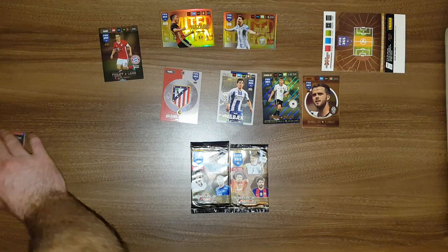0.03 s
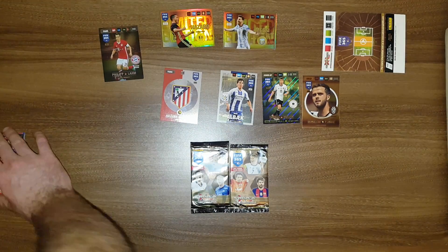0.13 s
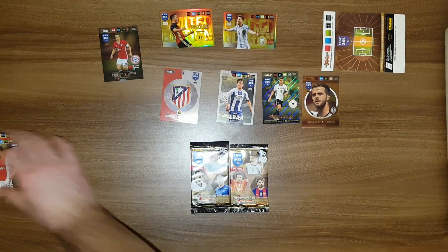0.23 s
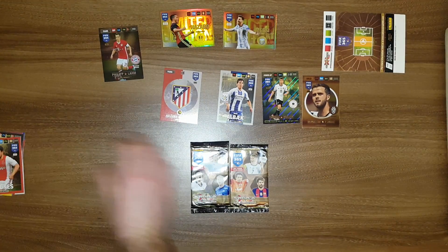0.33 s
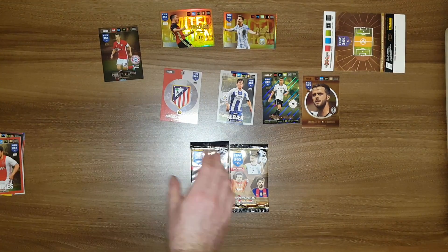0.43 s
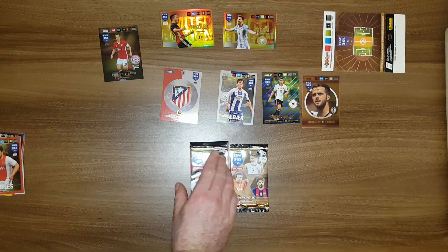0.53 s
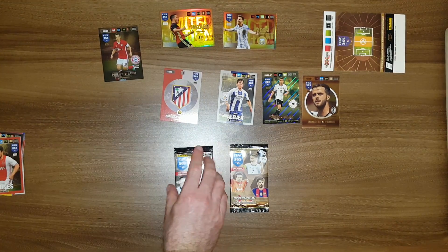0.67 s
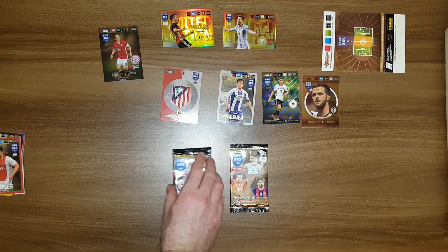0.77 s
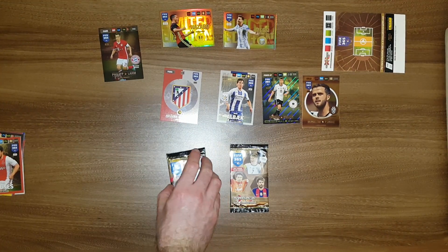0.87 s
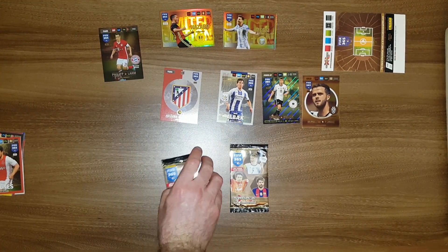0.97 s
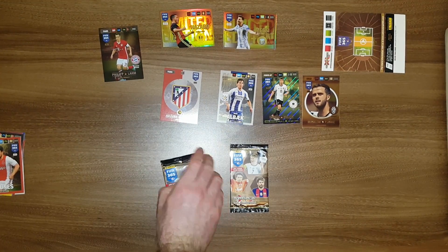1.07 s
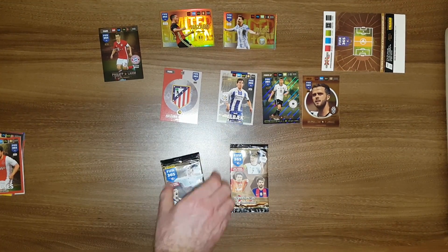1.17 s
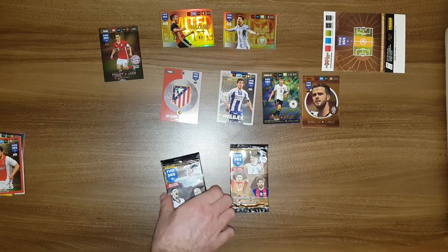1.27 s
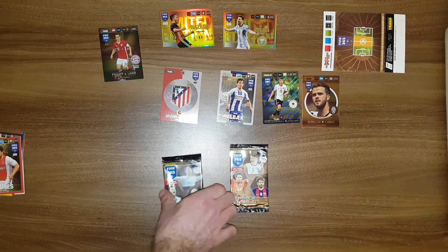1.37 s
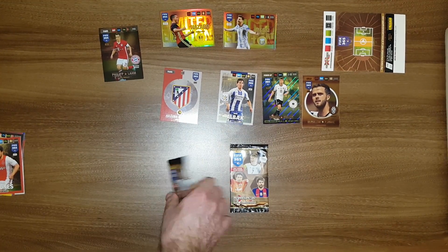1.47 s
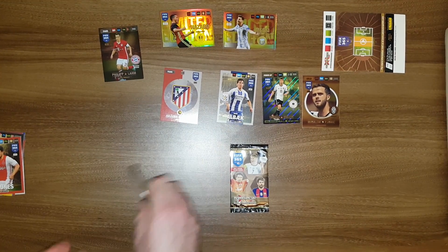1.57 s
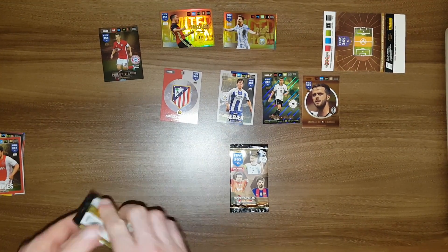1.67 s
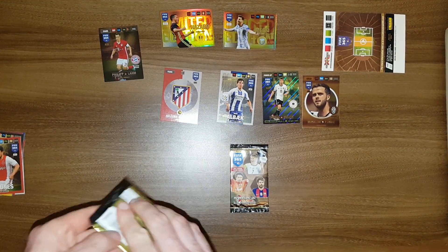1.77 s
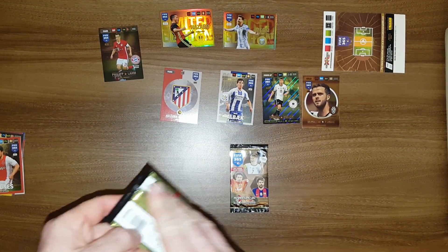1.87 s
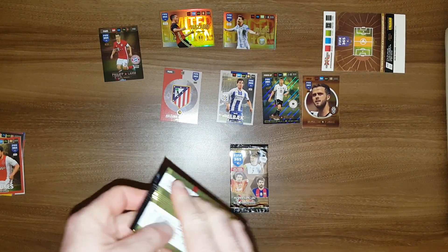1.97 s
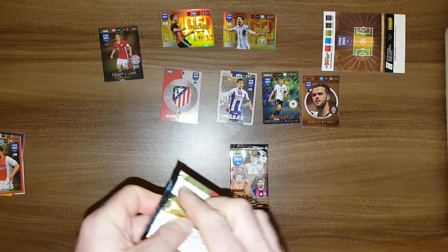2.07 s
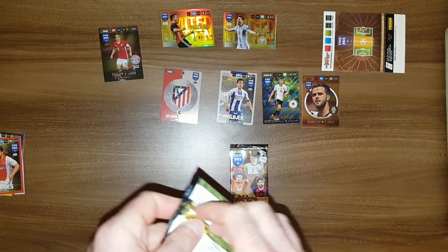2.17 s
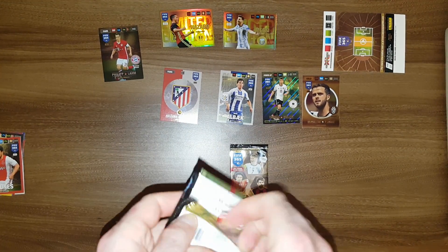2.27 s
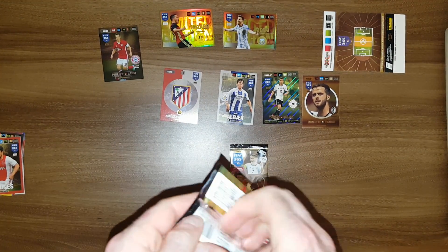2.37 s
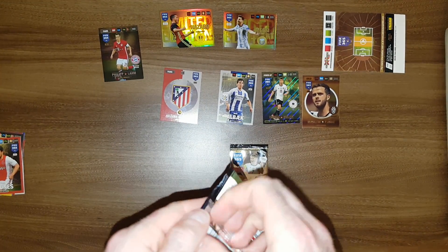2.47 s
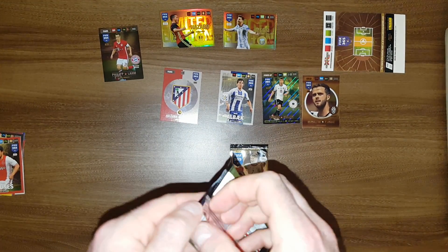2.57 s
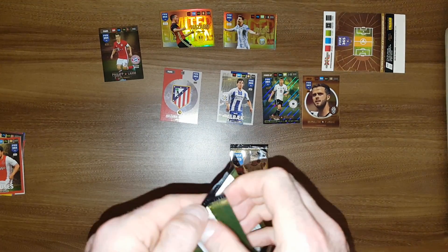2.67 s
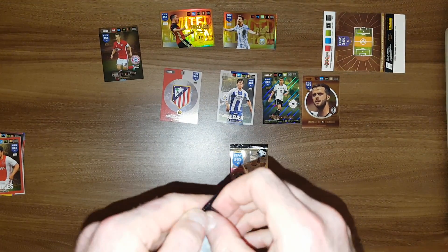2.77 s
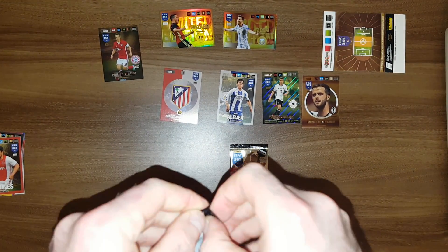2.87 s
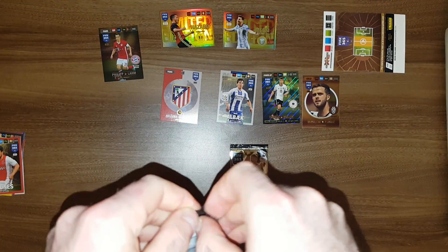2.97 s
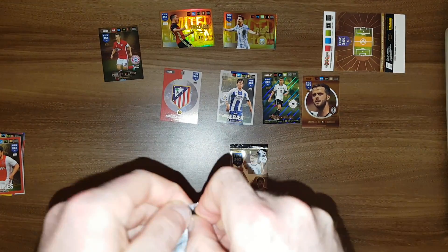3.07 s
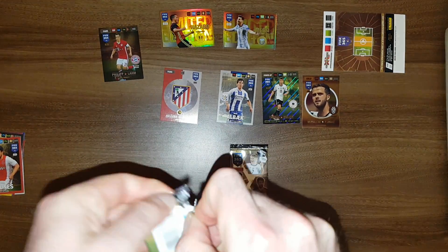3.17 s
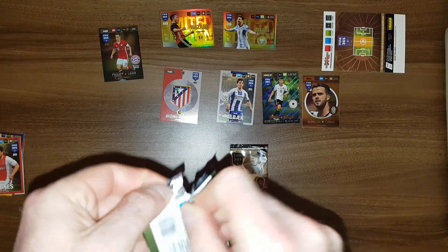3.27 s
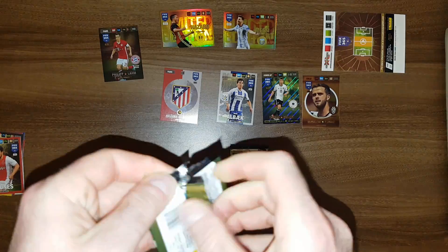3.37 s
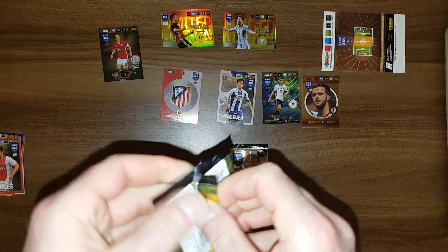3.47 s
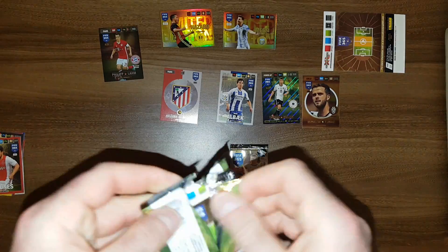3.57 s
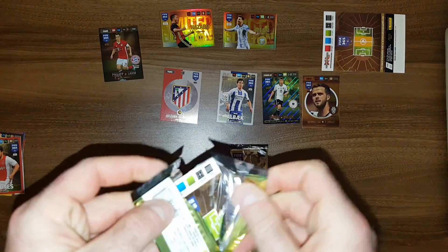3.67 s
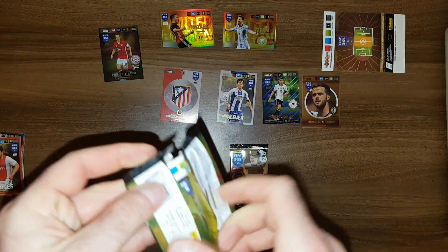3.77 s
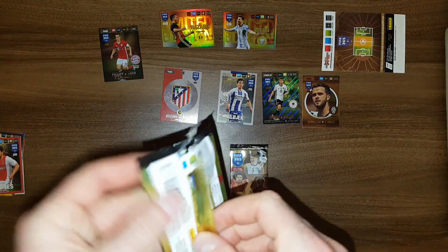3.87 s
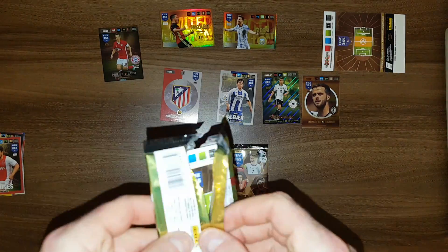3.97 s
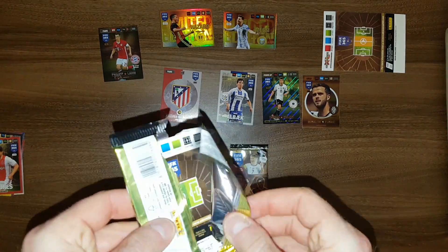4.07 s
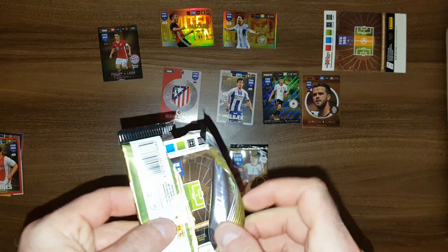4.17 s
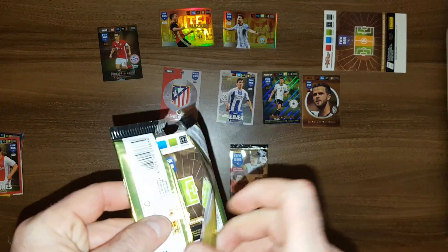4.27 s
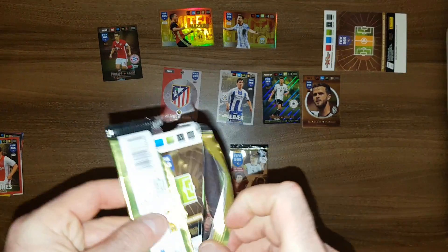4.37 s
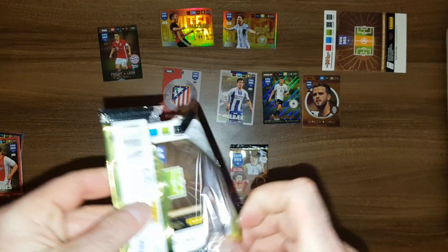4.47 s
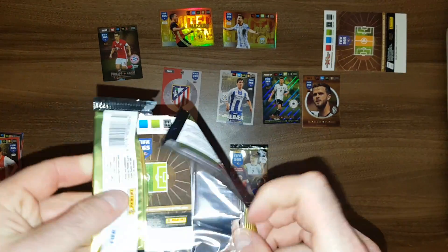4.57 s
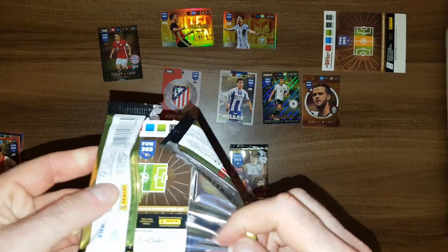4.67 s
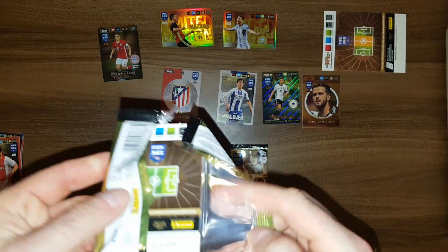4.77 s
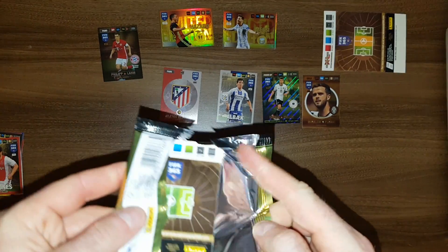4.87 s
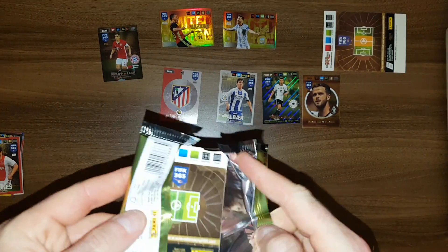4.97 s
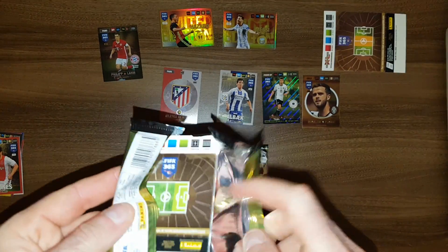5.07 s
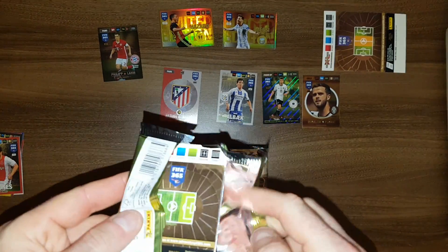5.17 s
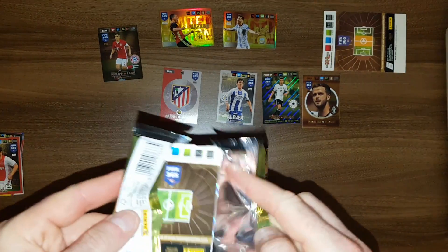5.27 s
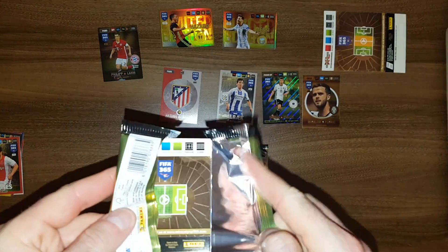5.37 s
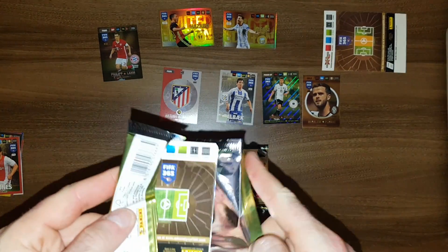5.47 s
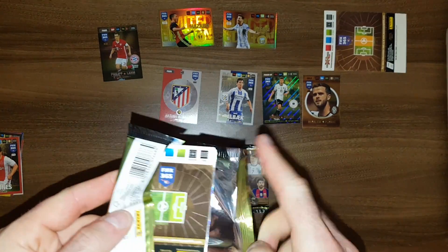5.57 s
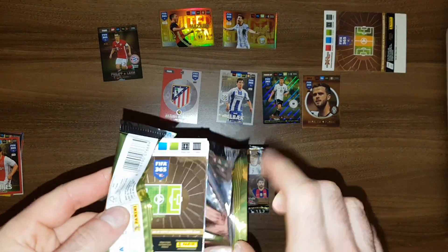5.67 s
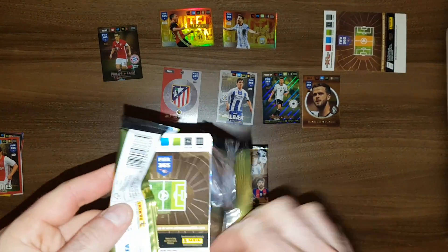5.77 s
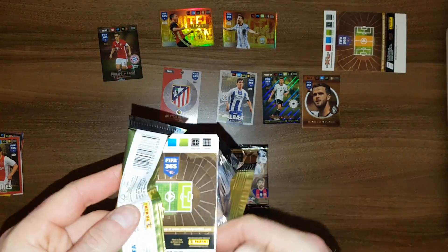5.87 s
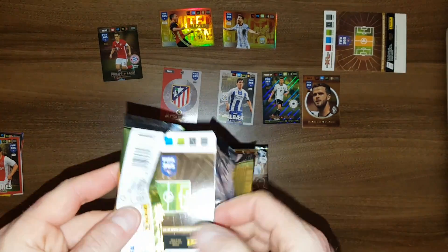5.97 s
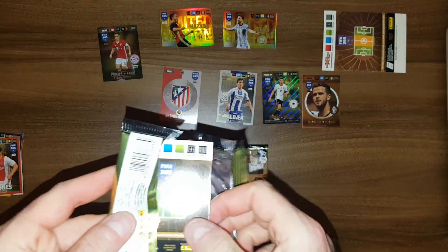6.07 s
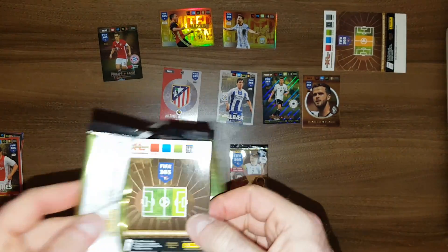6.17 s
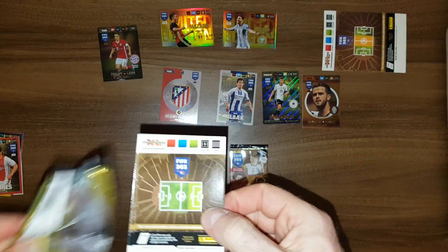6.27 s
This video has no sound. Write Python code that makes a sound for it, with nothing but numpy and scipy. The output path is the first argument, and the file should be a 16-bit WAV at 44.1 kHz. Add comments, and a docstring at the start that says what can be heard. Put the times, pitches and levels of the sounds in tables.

```python
"""Over a soft hiss, cards tap and slap onto a pile: noise bursts with short rings, then knocks on ringing wood.
A foil packet slides off the table in strokes of hiss and scrape, then is torn and crumpled close to a phone.
Creases snap as buckling rings with bright ticks, over a swarm of smaller crackles with each squeeze.
Panels pop with low thuds, and a slack curve sets how strongly the sheet flexes.
A small room answers with decaying noise, and the two microphones at the ends of the phone hear it with a lag."""
import sys
import numpy as np
from scipy import signal
from scipy.fft import rfft, irfft, next_fast_len
from scipy.io import wavfile

SR = 44100
rng = np.random.default_rng(int(sys.argv[2]) if len(sys.argv) > 2 else 0)


def bounce(signal):
    """Save signal as a 16-bit WAV file at the path given by the first command-line argument."""
    frames = np.transpose(np.atleast_2d(signal))
    limited = np.clip(frames, -1, 1)
    pcm = np.round(limited * 32767).astype(np.int16)
    wavfile.write(sys.argv[1], SR, pcm)


N = 278403  # samples


def undb(db):
    """Decibels to amplitude."""
    return 10 ** (np.asarray(db) / 20)


def unit(x):
    """Scale to an RMS of 1."""
    return x / np.sqrt(np.mean(x ** 2))


def colour(x, table, lag_s=0.):
    """Filter through (f/Hz, level/dB) points joined on a log frequency axis, with an optional lag."""
    hz, db = np.transpose(table)
    n = next_fast_len(x.shape[-1] + 512)
    f = np.arange(n // 2 + 1) * SR / n + 1e-3  # keeps the log finite
    gain = undb(np.interp(np.log(f), np.log(hz), db))
    gain = gain * np.exp(-2j * np.pi * f * lag_s)
    return irfft(rfft(x, n) * gain, n)[..., :x.shape[-1]]


def ring(x, hz, width_hz):
    """One resonance, gain 1 at the centre."""
    return signal.lfilter(*signal.iirpeak(hz, hz / width_hz, SR), x)


def place(s, shapes):
    """Lay one short shape at each time."""
    at = (np.asarray(s) * SR).astype(int)[:, None] + np.arange(shapes.shape[1])
    return np.bincount(at.ravel(), shapes.ravel(), N + shapes.shape[1])[:N]


def buckles(hz, db, cycles, chatter, size):
    """A crease buckles: a ring of a few cycles, broken up by chatter of the neighbouring folds."""
    turn = np.arange(size) / SR * np.asarray(hz)[:, None]  # cycles elapsed
    chance = rng.standard_normal((len(turn), size))
    wander = chatter * np.cumsum(chance, axis=1) * np.sqrt(turn[:, 1:2])
    tone = np.sin(2 * np.pi * turn + wander)
    envelope = np.exp(-turn / cycles) * np.minimum(2 * turn, 1)
    return undb(db)[:, None] * envelope * tone


def bursts(db, decay_s, size, rise_s=0.):
    """Decaying noise bursts, evened to equal energy for equal level, with an optional short rise."""
    t = np.arange(size) / SR - 3 * rise_s
    shape = np.exp(-np.abs(t) / np.where(t < 0, rise_s, decay_s))
    noise = rng.standard_normal((len(db), size)) * shape
    even = np.sqrt(np.sum(shape ** 2, axis=-1) / np.sum(noise ** 2, axis=1))
    return undb(db)[:, None] * noise * even[:, None]


def swarm(per_s, lo_hz, hi_hz, scatter_db, cycles, count):
    """Small buckles at random times; positive scatter lifts a few above the rest, negative sinks a few."""
    gap, pitch, big = rng.random((count, 3)).T
    s = np.cumsum(-np.log(1 - gap)) / per_s
    db = -scatter_db * np.log(1 - .97 * big)
    hz = lo_hz * (hi_hz / lo_hz) ** pitch
    shapes = buckles(hz, db, cycles, chatter=0.82, size=200)
    inside = s < N / SR
    x = place(s[inside], shapes[inside])
    return unit(colour(x, [(lo_hz / 4, -20), (lo_hz, 0)]))


# Spectrum of the background hiss: (f/Hz, level/dB)
QUIET_COLOUR = [(30, 11.5), (100, 0), (200, 3.5), (400, 0), (1000, -9), (2500, -10), (5000, -20),
                (9000, -26), (13000, -18.5), (16000, -21)]
QUIET_DB = -66


def quiet():
    """Still room and microphone hiss; a nearly even part of the hiss is shared by both microphones."""
    own = colour(rng.standard_normal((2, N)), QUIET_COLOUR)
    shared = colour(rng.standard_normal(N), QUIET_COLOUR)
    shared = colour(shared, [(150, -6.0), (600, -5)])
    return unit(own + shared) * undb(QUIET_DB)


# Cards meeting cards and small taps: (t/s, relative level/dB, ring f/Hz, noise decay/s)
CARD_HITS = [(0, -57.5, 514, 0.022), (0.169, -41, 2440, 0.0076), (0.182, -26.5, 2860, 0.017),
             (.529, -45, 1880, 0.00013), (1.512, -51, 1380, 0.0015)]
# Spectrum of the card slap noise: (f/Hz, level/dB)
CARD_COLOUR = [(88, -23), (150, 0.5), (504, -7.5), (578, -16), (905, -3), (1260, -10), (1340, -6),
               (2870, -7.5), (16000, -32.5)]


def cards():
    """Cards slap and tap: a coloured noise burst with a short chattering ring."""
    s, db, hz, decay_s = np.transpose(CARD_HITS)
    slap = colour(place(s, bursts(db + 7.5, decay_s[:, None], size=3000)), CARD_COLOUR)
    return slap + place(s, buckles(hz, db, cycles=2.8, chatter=0.69, size=400))


# Knocks on the table top: (t/s, relative level/dB, hardness/dB per octave)
KNOCKS = [(0.183, -35, 0), (0.687, -53, -7), (0.853, -48, -13), (1.054, -46.5, -3), (1.1, -51, 4.5),
          (1.347, -36, -5), (1.421, -52, 5.5), (1.566, -42.5, -8), (1.625, -43, -3.5), (1.765, -52.5, 6)]
# Ringing modes of the wood: (f/Hz, relative level/dB, t60/s)
WOOD_MODES = [(100, -5.5, 0.19), (127.8, -1, 0.28), (214, -9.5, 0.37), (308, -11, 0.13), (507, -9, 0.13)]


def knocks():
    """Fingertips and card pile knock the wood, which rings in decaying modes."""
    s, db, hard_db = np.transpose(KNOCKS)
    t = np.arange(SR // 3) / SR
    phase = 2 * np.pi * rng.random((len(s), len(WOOD_MODES)))
    modes = 0
    for k, (hz, mode_db, t60) in enumerate(WOOD_MODES):
        # a harder contact favours the upper modes
        level = undb(mode_db + hard_db * np.log2(hz / WOOD_MODES[1][0]))[:, None]
        modes = modes + level * np.sin(2 * np.pi * hz * t + phase[:, k:k + 1]) * 1000. ** (-t / t60)
    onset = 1 - np.exp(-t / 0.0029)
    return place(s, undb(db - 8.0)[:, None] * modes * onset)


# Strokes of the slide: (peak t/s, rise/s, fall/s, hiss level/dB, scrape level/dB)
SLIDES = [(.755, 0.078, 0.023, -57.5, -82), (.91, 0.048, 0.084, -65, -74), (1.06, 0.015, 0.034, -54, -66.5),
          (1.44, 0.056, 0.078, -68, -70), (1.563, 0.0065, 0.067, -56, -53.5)]


def strokes(column):
    """Level of one slide layer: every stroke swells to its fastest moment and dies away."""
    t = np.arange(N) / SR
    level = 0
    for row in SLIDES:
        peak_s, rise_s, fall_s = row[:3]
        swell = np.exp(np.minimum((t - peak_s) / rise_s, (peak_s - t) / fall_s))
        level = level + undb(row[column]) * swell
    return level


# Spectrum of the sliding hiss: (f/Hz, level/dB)
SLIDE_COLOUR = [(410, -58), (700, -31), (1500, -24), (1940, -9), (3030, -5.5), (5470, -7.5), (7490, -4.5),
                (16000, -8.5)]


def slide():
    """The packet slides over wood: coloured noise hisses and a swarm of small rings scrapes."""
    hiss = unit(colour(rng.standard_normal(N), SLIDE_COLOUR))
    scrape = swarm(per_s=250., lo_hz=1100., hi_hz=2300., scatter_db=4., cycles=2.5, count=5000)
    return strokes(column=3) * hiss + strokes(column=4) * scrape


# Slackness of the packet as a gain on its low flexing: (t/s, level/dB)
SLACK = [(1.7, 0.5), (2.3, -12), (3.1, -11), (3.5, -5), (3.9, -8.5), (4.5, -3), (4.9, 2.5), (5.6, 5),
         (6.31, -2)]


def slack_db(s):
    """A slacker packet flexes more strongly; read that gain at any time."""
    return np.interp(s, *np.transpose(SLACK))


# Resonances of slack foil and air pocket: (f/Hz, width f/Hz, level/dB)
SHEET = [(133, 118, -8), (297, 120, 1.5), (594, 136, 2.5)]


def sheet(push):
    """The slack foil answers a push with low, short resonances."""
    return sum(undb(db) * ring(push, hz, width_hz) for hz, width_hz, db in SHEET)


# Panels that flip: (t/s, level/dB, ring f/Hz)
POPS = [(1.769, -48, 134), (2.335, -37.5, 290), (2.398, -38, 360), (3.255, -30.5, 460), (3.465, -38, 280),
        (3.729, -51, 264), (3.815, -30, 337), (4.055, -48, 350), (4.161, -49, 310), (4.186, -25.5, 242),
        (4.251, -38, 259), (4.35, -29, 272), (4.599, -46, 242), (4.631, -26, 285), (4.665, -32, 172),
        (4.726, -34, 214), (4.884, -33, 285), (4.924, -35, 277), (4.981, -40, 170), (5.078, -43, 191),
        (5.18, -55, 352), (5.298, -41, 275), (5.36, -51, 195), (5.413, -29, 287), (5.44, -36, 253),
        (5.526, -28, 261), (5.648, -39, 263), (5.719, -38, 283), (5.887, -30, 288), (5.959, -55, 291),
        (6.047, -38, 291), (6.072, -35.5, 245), (6.118, -32, 307)]
POP_DELAY_S, PUFF_HZ, PUFF_DB = 0.00384, 79, -7  # puff level is against the pop
HANDS_DB = -69.5


def pops():
    """Panels flip with a low thud and pump a puff of air; the fingers rub dully as filtered noise."""
    s, db, hz = np.transpose(POPS)
    thuds = place(s + POP_DELAY_S, buckles(hz, db, cycles=1.0, chatter=0.75, size=2000))
    puff_db = db + PUFF_DB + slack_db(s)
    puffs = place(s, buckles(PUFF_HZ + 0 * s, puff_db, cycles=0.31, chatter=0.54, size=3000))
    held = np.clip((np.arange(N) / SR - SLACK[0][0]) / 0.058, 0, 1)
    rub = undb(HANDS_DB) * held * unit(sheet(rng.standard_normal(N)))
    return thuds + puffs + rub


# Creases that snap: (onset t/s, relative level/dB, ring f/Hz, relative tick level/dB)
SNAPS = [(1.776, -31, 3760, -50), (1.855, -35, 7520, -3), (1.865, -29.5, 5000, -3), (1.887, -32, 8160, -7),
         (1.943, -32, 6000, -16), (1.97, -25, 5200, -18), (2.022, -34.5, 1590, -5), (2.103, -42, 1550, -1),
         (2.118, -21.5, 7750, -7.5), (2.145, -19.5, 3030, -17), (2.17, -15, 6010, -25),
         (2.195, -27.5, 1580, -15), (2.215, -17.5, 5000, -16), (2.293, -23, 4830, -15),
         (2.31, -21.5, 4970, -14), (2.339, -18, 1600, -20), (2.366, -20, 6230, -24), (2.38, -24, 3730, -8),
         (2.405, -21.5, 1500, -21), (2.453, -36.5, 820, -8), (2.492, -24.5, 5500, -16.5),
         (2.548, -27.5, 5300, -36), (2.566, -32, 4670, -24), (2.596, -37.5, 4170, -1),
         (2.698, -38, 6260, -13), (2.711, -28, 2330, -26), (2.728, -37, 790, -8), (2.756, -19.5, 2540, -27),
         (2.801, -24.5, 6800, -6), (2.82, -28, 6300, -15), (2.843, -27.5, 3870, -25),
         (2.871, -25.5, 6840, -17), (2.886, -23.5, 6120, -5), (2.953, -21.5, 5440, -13.5),
         (3.047, -32, 2300, -33), (3.114, -39.5, 6230, -3.5), (3.139, -46, 6700, 11), (3.162, -44, 7600, 0),
         (3.197, -23.5, 1880, -15), (3.207, -27, 6550, -13), (3.255, -12.5, 1670, -16),
         (3.265, -17, 4130, -0.5), (3.281, -11.5, 3970, -30), (3.321, -29, 3190, -15),
         (3.35, -20.5, 8300, -8), (3.359, -35, 8550, -13), (3.432, -33, 3480, -19), (3.468, -27, 1280, -22),
         (3.544, -36, 7090, 1), (3.561, -33.5, 5250, -2.5), (3.641, -41, 1230, 0), (3.66, -23.5, 8050, -7),
         (3.669, -15.5, 6230, -5), (3.696, -13.5, 1620, -8), (3.728, -11, 1150, -15),
         (3.763, -26.5, 1080, -10), (3.796, -30, 1880, -19), (3.815, -27.5, 1620, -3),
         (3.864, -15, 1730, -28), (3.873, -18, 1620, -26), (3.943, -34, 7490, 0), (3.955, -20.5, 5870, -11),
         (3.966, -23, 7280, -7), (4.039, -35, 4700, -10), (4.055, -21.5, 1310, -18),
         (4.129, -16, 3940, -29), (4.142, -13.5, 3760, -21), (4.16, -12, 1660, -22), (4.173, -8, 1570, -39),
         (4.184, -18, 1570, -38), (4.229, -32, 1700, -15), (4.258, -10.5, 1570, -32),
         (4.346, -14.5, 4070, -32), (4.359, -11, 1500, -35), (4.396, -26.5, 2980, -10),
         (4.424, -17.5, 1460, -22), (4.465, -13.5, 3270, -38), (4.48, -14.5, 1530, -15),
         (4.514, -25, 7780, -15), (4.525, -11.5, 5450, -20), (4.539, -17, 4760, -13),
         (4.544, -23, 5980, -19), (4.554, -20, 1830, -23), (4.598, -29, 2220, -22),
         (4.604, -21, 1160, -6.5), (4.631, -14, 1590, -20), (4.654, -17, 1080, -17), (4.663, -20, 810, -11),
         (4.723, -21, 1550, -34), (4.78, -26, 4500, -8), (4.788, -21.5, 1847, -42),
         (4.855, -24.5, 1730, -45), (4.885, -24, 930, -9), (4.906, -20, 1720, -23),
         (4.925, -16.5, 1850, -28), (4.949, -29, 810, 1), (4.982, -22, 820, -47), (5.012, -26.5, 1160, -11),
         (5.042, -21, 6200, -32), (5.074, -29, 1210, -30), (5.095, -23, 7520, -9),
         (5.138, -21.5, 1140, -42), (5.148, -25, 8040, -10), (5.167, -26.5, 1080, -28),
         (5.188, -17.5, 2400, -20), (5.284, -26.5, 1110, -19), (5.298, -30.5, 920, -2.5),
         (5.324, -26, 2690, -6.5), (5.332, -28.5, 1120, -12), (5.351, -35, 2680, -7), (5.398, -38, 870, 2),
         (5.411, -23, 977, -17), (5.423, -17.5, 1150, -21), (5.442, -32.5, 905, 3), (5.474, -33, 900, -7),
         (5.528, -18, 2010, -28), (5.556, -36, 1830, -23), (5.582, -19, 6600, -16.5),
         (5.657, -34.5, 1140, -37), (5.689, -32.5, 6940, -12), (5.715, -30, 4840, -15),
         (5.888, -30, 780, -4), (5.892, -27.5, 1090, -9), (5.925, -24.5, 2970, -26),
         (5.964, -19.5, 6400, -32), (6.009, -27.5, 5700, -11), (6.076, -22, 1700, -9.5),
         (6.114, -27.5, 1230, -6), (6.214, -32.5, 1570, -26), (6.303, -29, 930, -32)]
# Spectrum of the foil spray: (f/Hz, level/dB)
FOIL_COLOUR = [(300, -4), (700, -51), (1400, 4.5), (3000, 8), (5500, 11.5), (12000, 8.5), (16000, 7.5)]
FLEX_DB, FLEX_DB_PER_OCTAVE, FLEX_SCATTER_DB = -6.5, -4.5, 3  # long creases ring low and bend the sheet more
ONSET_TO_PEAK_S = .001  # from the listed onset to the loudest moment of the snap
TICK_DB, SPRAY_DB, AFTER_DB = 11, -6, -17


def snaps():
    """Each crease: ring, bright tick, a spray around it, a flex of the sheet and dwindling aftershocks."""
    s, db, hz, tick_db = np.transpose(SNAPS)
    s = s + ONSET_TO_PEAK_S
    rings = place(s - .5 / hz, buckles(hz, db - 2.0, cycles=1.46, chatter=0.84, size=400))
    rings = colour(rings, [(200, -9.5), (800, 2)])
    ticks = place(s, bursts(db + tick_db + TICK_DB, decay_s=0.000059, size=200))
    ticks = colour(ticks, [(4000, -21.0), (9000, 6.5)])
    # the brighter the crease, the more it sprays
    spray_db = db + 0.36 * tick_db + SPRAY_DB
    spray = place(s - .0012, bursts(spray_db, decay_s=0.0013, size=900, rise_s=0.0004))
    spray = colour(spray, FOIL_COLOUR)
    flex_db = db + FLEX_DB + slack_db(s) + FLEX_DB_PER_OCTAVE * np.log2(hz / 2000)
    flex_db = flex_db + FLEX_SCATTER_DB * rng.standard_normal(len(s))
    flex = sheet(place(s - .003, bursts(flex_db, decay_s=0.0041, size=900, rise_s=0.0012)))
    decay = np.exp(-np.arange(SR // 8) / SR / 0.0089)
    strain = place(s, undb(db + AFTER_DB)[:, None] * decay)
    crackle = swarm(per_s=600., lo_hz=1600.0, hi_hz=11800.0, scatter_db=8.5, cycles=1.0, count=12000)
    return rings + ticks + spray + flex + strain * crackle


# Squeezes of the packet: (t/s, hold/s, level/dB)
SQUEEZES = [(1.778, 0.11, -68.5), (1.85, 0.026, -59), (1.94, 0.23, -67), (2.099, 0.15, -56.5),
            (2.291, 0.15, -54), (2.478, 0.11, -50.5), (2.7, .28, -61), (3.041, 0.042, -59),
            (3.11, .06, -84), (3.19, 0.05, -57), (3.255, 0.094, -53), (3.429, 0.033, -58),
            (3.541, 0.061, -52.5), (3.647, .13, -43), (3.81, 0.07, -47.5), (3.934, 0.063, -49.5),
            (4.038, 0.039, -45.5), (4.127, 0.058, -39.5), (4.25, 0.018, -50.5), (4.344, 0.1, -47.5),
            (4.501, 0.16, -42.5), (4.72, 0.084, -48), (4.883, 0.11, -48), (5.09, .11, -54),
            (5.278, 0.071, -55), (5.383, 0.13, -49.5), (5.509, 0.08, -53.5), (5.655, 0.075, -60),
            (5.881, 0.15, -56.5), (6.068, 0.074, -50.5), (6.199, .05, -61.5), (6.28, .05, -50.5)]
GRIP_S, LET_GO_S, HELD_DB = 0.0066, 0.0098, -78  # the held packet never falls quite silent
LESSER_DB = -2.  # scattered lesser snaps against the fine crackle
RUSTLE_DB, RUSTLE_SHARE, SHEET_DB = 3.5, 0.62, -5.5  # larger creases follow a share of the slack, the sheet all


def crumple():
    """Each squeeze sets off fine crackle, lesser snaps, larger creases and the flexing sheet."""
    t = np.arange(N) / SR
    grip = undb(HELD_DB) * (t > SQUEEZES[0][0])
    for s, hold_s, db in SQUEEZES:
        edges = np.minimum((t - s) / GRIP_S, (s + hold_s - t) / LET_GO_S)
        grip = grip + undb(db) * np.exp(np.minimum(edges, 0))
    fine = swarm(per_s=1000.0, lo_hz=2720.0, hi_hz=14300.0, scatter_db=4.0, cycles=0.17, count=16000)
    lesser = swarm(per_s=110., lo_hz=1560.0, hi_hz=12200.0, scatter_db=7.0, cycles=0.56, count=1500)
    large = swarm(per_s=500., lo_hz=960.0, hi_hz=2890.0, scatter_db=12.0, cycles=0.62, count=6000)
    pushes = swarm(per_s=200., lo_hz=146.0, hi_hz=920.0, scatter_db=-4.0, cycles=0.27, count=3000)
    slack = slack_db(t)
    crackle = fine + undb(LESSER_DB) * lesser
    rustle = undb(RUSTLE_DB + RUSTLE_SHARE * slack) * large
    flex = undb(SHEET_DB + slack) * unit(sheet(pushes))
    return grip * (crackle + rustle + flex)


# Bands of the room's decay: (f/Hz, t60/s, relative level/dB)
ROOM = [(155, 0.43, 0.5), (510, 0.21, -2.5), (1390, 0.26, -4), (4470, 0.25, -2), (11890, 0.16, 2.5)]


def room(x):
    """Dense echoes, lasting longest in the bass; long waves reach both microphones alike."""
    t = np.arange(SR // 3) / SR
    tail = 0
    for hz, t60, db in ROOM:
        band = ring(rng.standard_normal((2, len(t))), hz, 1.77 * hz)
        mid, side = band * undb(db) * 1000. ** (-t / t60)
        tail = tail + mid + min(hz / 890.0, 1) * side * np.array([[1], [-1]])
    tail = tail * (1 - np.exp(-t / 0.00023))
    return signal.fftconvolve(x[None], tail / np.sqrt(np.sum(tail ** 2) / 2), axes=1)


# Far microphone port, shadowed by the phone: (f/Hz, level/dB)
FAR_PORT = [(100, -2.5), (2500, -2), (5000, -4.5), (8000, -9), (9200, -18)]
# Echoes at the far port, which peaks and then dips: (f/Hz, level/dB)
FAR_ECHOES = [(300, -2.5), (3000, 0), (7900, 3), (9200, -8), (12000, -3.5)]
LAG_S, LAG_SPREAD_S = 0.00019, .00007
ROOM_DB = -3


def heard(air, size):
    """The hands keep moving: each short stretch has its own lag between the microphones and its own echoes."""
    out = np.zeros((2, N + SR))
    padded = np.pad(air, (size, 2 * size))
    window = signal.get_window("hann", 2 * size)  # half-overlapping stretches cross-fade
    for at in range(0, N + size, size):
        part = np.pad(padded[at:at + 2 * size] * window, (0, 512))  # room for the lag
        far = colour(part, FAR_PORT, LAG_S + LAG_SPREAD_S * rng.standard_normal())
        echoes = undb(ROOM_DB) * room(part)
        echoes[1] = colour(echoes[1], FAR_ECHOES)
        out[:, at:at + len(part)] += undb(0.5) * np.array([part, far])
        out[:, at:at + echoes.shape[1]] += echoes
    return out[:, size:size + N]


def scene():
    """Cards and packet reach the microphones through the air, the wood through the stand."""
    air = cards() + slide() + pops() + snaps() + crumple()
    through_stand = knocks() * undb([[1.5], [-1.5]])
    return quiet() + through_stand + heard(air, size=2048)


TOP_HZ = 15900
OFFSET = -.00051  # of full scale


def record(dry):
    """The phone thins the deep bass, cuts the top and sits on a small offset."""
    thin = signal.sosfilt(signal.butter(2, 70., "high", fs=SR, output="sos"), dry)
    return signal.sosfilt(signal.ellip(8, .2, 60, TOP_HZ, fs=SR, output="sos"), thin) + OFFSET


dry = scene()
out = record(dry)
bounce(out)
```